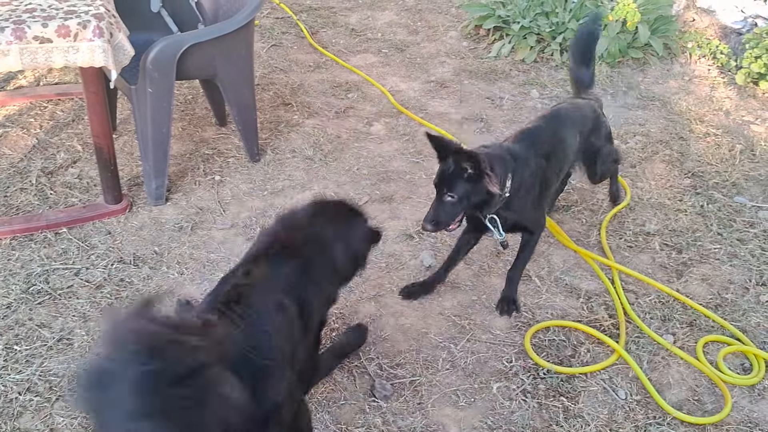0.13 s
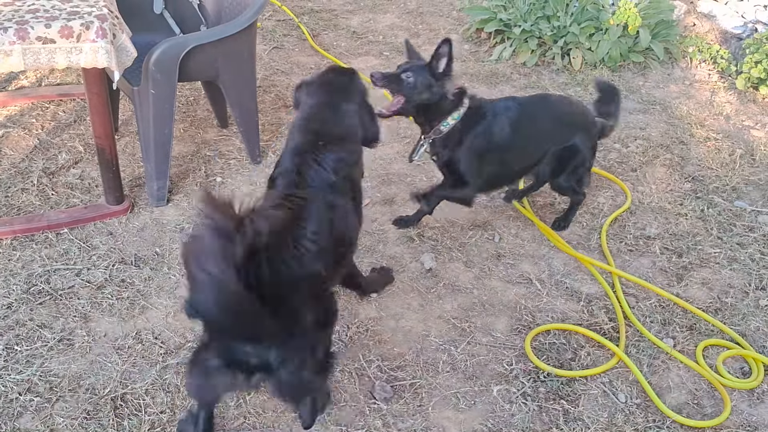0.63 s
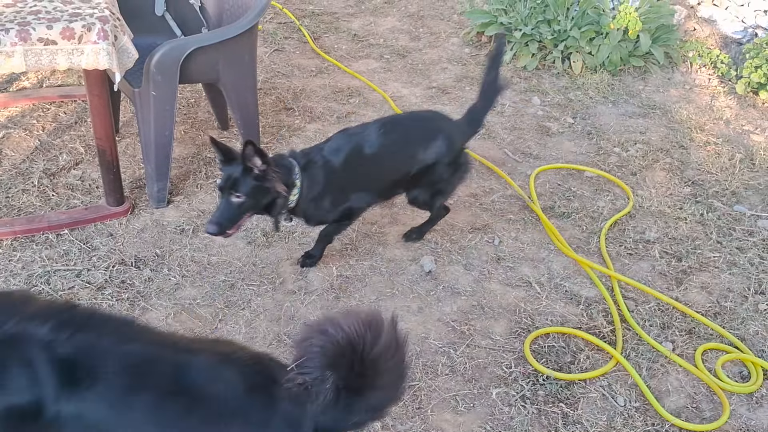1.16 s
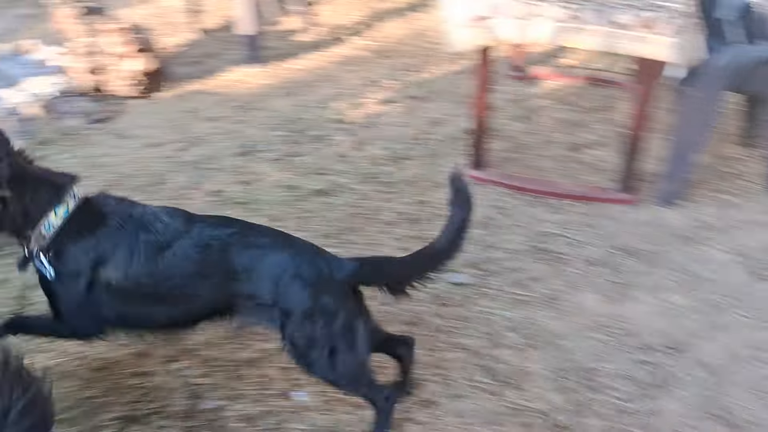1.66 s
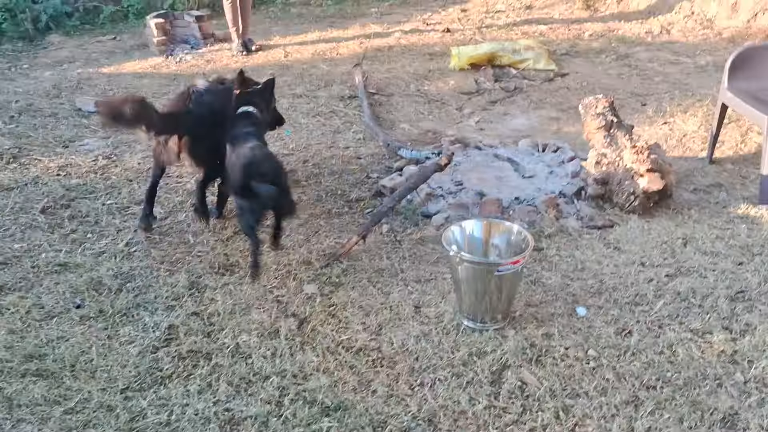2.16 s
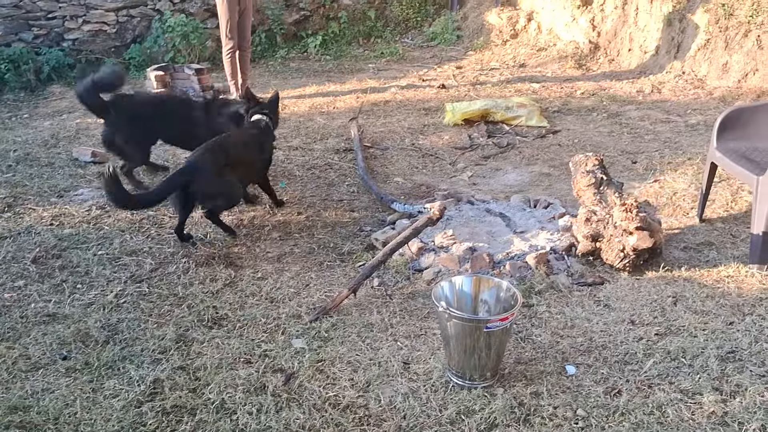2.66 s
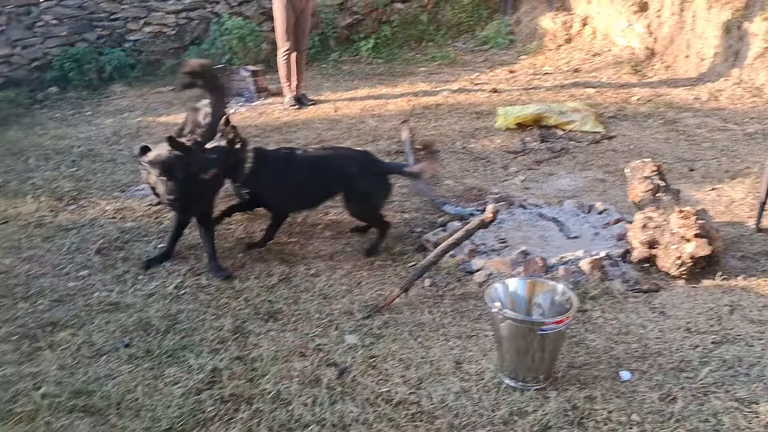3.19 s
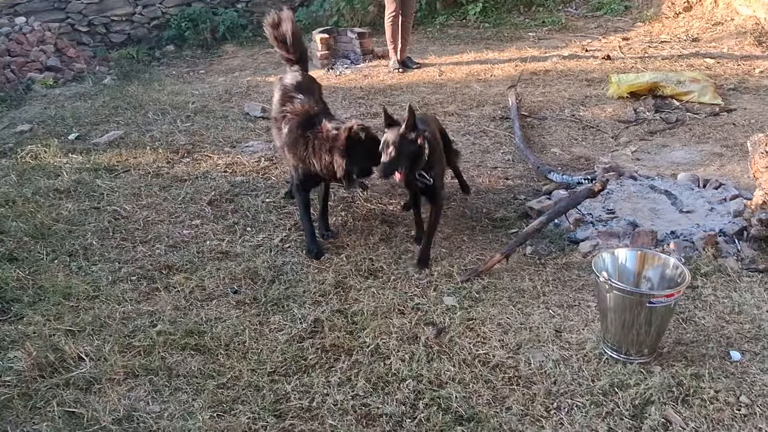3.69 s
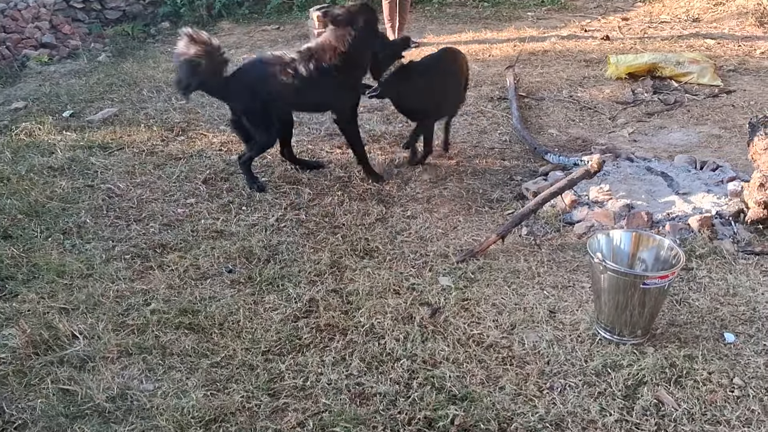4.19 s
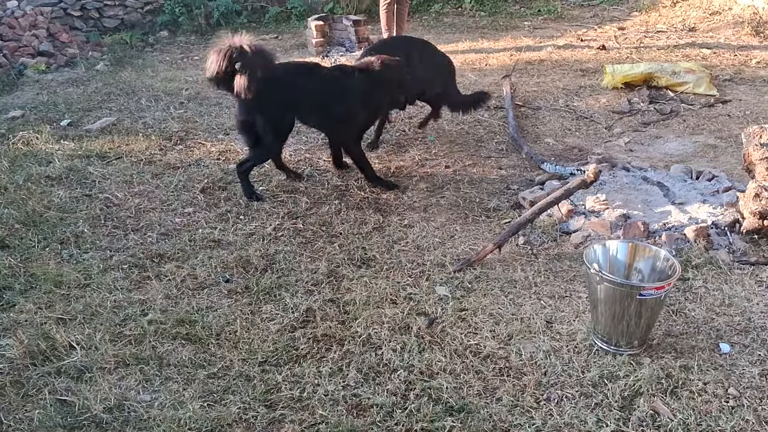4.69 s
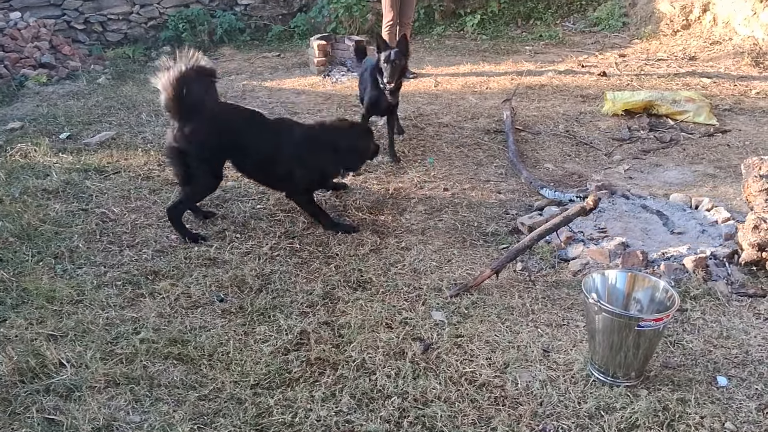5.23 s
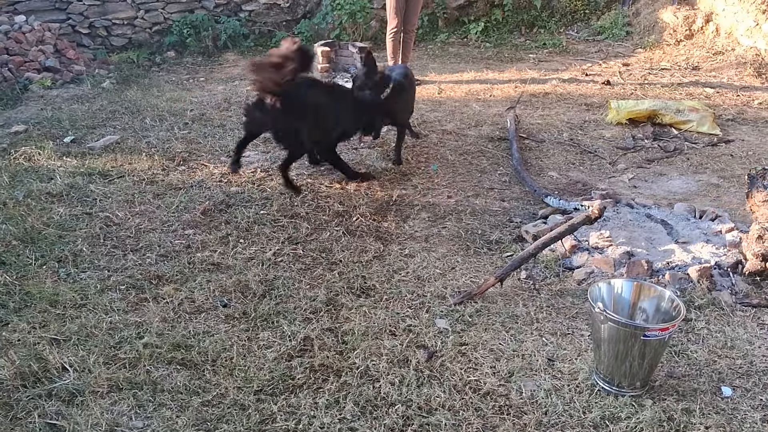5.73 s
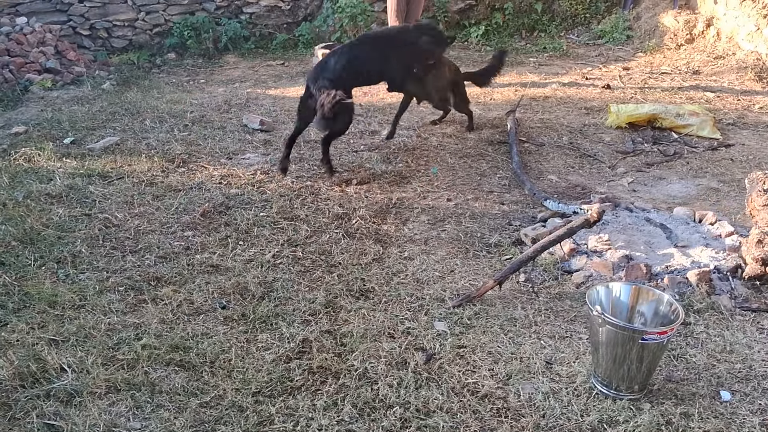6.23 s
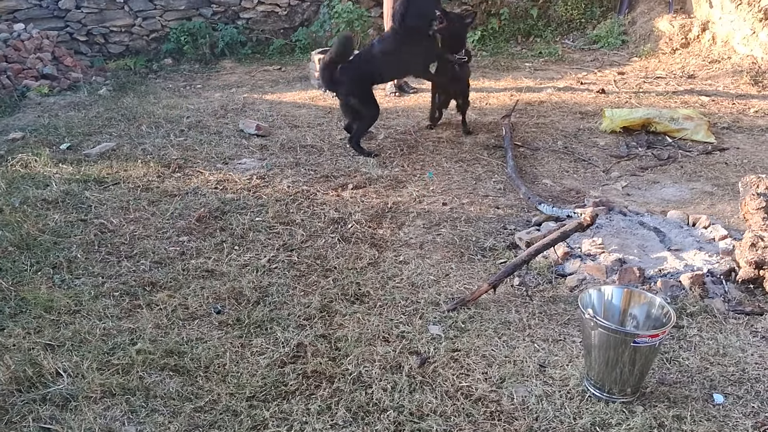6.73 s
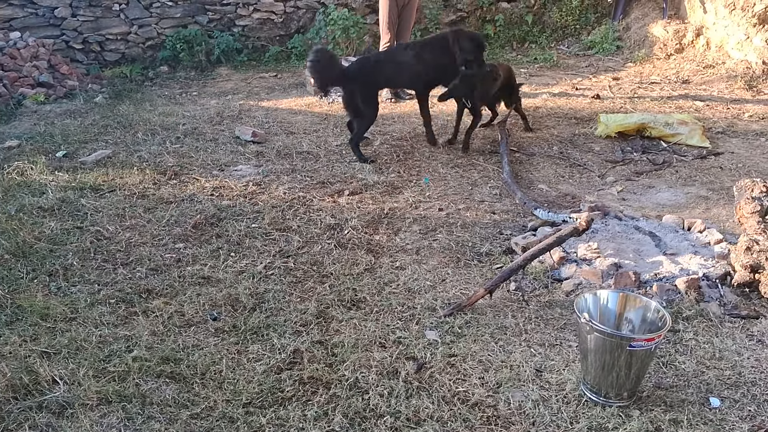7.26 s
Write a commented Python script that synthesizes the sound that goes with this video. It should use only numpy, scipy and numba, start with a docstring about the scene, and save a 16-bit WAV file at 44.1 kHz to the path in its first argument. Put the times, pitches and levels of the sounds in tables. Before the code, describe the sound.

Close outdoor stereo sound of dogs wrestling: low, rasping growls with snarling air, brief gruff grunts, quick breaths, soft paw thumps and rustling dry grass. A tiny collar bell tinkles and rattles almost without pause, brightest in dense clusters. Just after the middle a very faint high whistle rises and sinks. The last long growl is followed by more jingling, panting and a final small grunt.

```python
"""Two dogs wrestle on dry grass, a few steps away: panted breath and crackling grains of grass open the scene.
At once a small collar bell jingles, decaying modes struck by touches, and paws thud as low pushes with dust.
Short grunts alternate with three long growls with snarls: irregular vocal fold beats and air ring chest, throat,
mouth and teeth. Midway a faint whistle, a gliding sine, rises, wavers and sinks; the tussle goes on to the end."""
import sys
import numpy as np
from scipy import signal
from scipy.io import wavfile
from scipy.ndimage import uniform_filter1d
from numba import njit

SR = 44100
rng = np.random.default_rng(int(sys.argv[2]) if len(sys.argv) > 2 else 0)


def attenuation_scalar(level_db):
    """Turn a level in dB into a linear amplitude multiplier (20 dB per decade)."""
    decades = np.asarray(level_db, float) / 20
    return 10 ** decades


def dump(signal):
    """Clip the signal to [-1, 1] and save it as 16-bit WAV at the path in sys.argv[1]."""
    limited = np.clip(np.atleast_2d(signal).T, -1, 1)
    pcm = np.round(limited * 32767).astype(np.int16)
    wavfile.write(sys.argv[1], SR, pcm)


N = 325017

# Levels in the tables are relative: filters, slow chance and the yard shape them further.
# long growls, one curve each: time_s, chest_effort_db, jaw_opening_db (mouth over chest), mouth_hz, beats_hz
GROWL_CURVES = [
    [(0.53, -79.5, -23, 854, 150.9), (0.55, -40.5, -7.5, 880, 154.1), (0.6, -32.5, -6, 870, 169.9),
     (0.65, -33.5, -3, 920, 120.7), (0.71, -29, -9, 760, 153), (0.82, -35.5, -9.5, 940, 156),
     (0.87, -34, -16, 606, 147.2), (0.92, -26.5, -18, 608, 159.2), (0.98, -36.5, -11, 830, 141.6),
     (1.04, -50, -11, 825, 140.7), (1.16, -69, -11, 930, 140)],
    [(3.145, -73, 8, 763, 150.7), (3.165, -38, -2, 730, 156.5), (3.236, -37, 4, 753.4, 179.8),
     (3.254, -26.5, 4.5, 783, 192.2), (3.33, -31, 0, 904, 180.5), (3.4, -34.5, -2, 660, 181),
     (3.5, -35, -13.5, 680.4, 156.4), (3.59, -37.5, -18.5, 621.4, 141.7), (3.71, -43.5, -14.5, 790, 123.1),
     (3.8, -48, 2.5, 770, 118.4), (3.98, -72, -3, 918, 113.1)],
    [(5.82, -73.5, -19, 701, 163.5), (5.845, -35.5, -15.5, 687, 173.8), (5.93, -35.5, -19, 710, 150.6),
     (6.02, -37.5, -15.5, 898.3, 159.7), (6.13, -34.5, -7.5, 647.5, 148.5), (6.16, -47, -27, 852, 144.2),
     (6.18, -42, -4.5, 758, 149.8), (6.23, -34.5, -12.5, 588.8, 161.1), (6.29, -35.5, -25, 639.3, 146.9),
     (6.36, -36.5, 2, 727, 150.1), (6.41, -31.5, -12.5, 795.5, 150.6), (6.51, -29, -2.5, 835, 154.5),
     (6.61, -36.5, -1.5, 865.3, 144.8), (6.7, -56, -12, 961, 138.4)],
]
# throat of each long growl: throat_hz, over_chest_db, share of the jaw opening it follows
GROWL_THROATS = [(400, 6, 1), (348, -3.5, 0.23), (415.5, -17, 0.031)]
# short grunts: peak_s, hold_s, chest_db, jaw_opening_db, mouth_hz
GRUNTS = [(0.213, 0.02, -43.5, -8, 600), (2.293, 0.029, -30.5, -11, 645), (2.776, 0.037, -47.5, -26, 704),
          (5.229, 0.048, -28.5, -18.5, 892), (5.63, 0.02, -44.5, -4.5, 624.7), (7.317, 0.05, -44, -50, 880)]
# throat of every grunt: throat_hz, over_chest_db, share of the jaw opening it follows
GRUNT_THROAT = (392, 0.47, 0.85)
# panted breaths: peak_s, hold_s, mouth_db, mouth_hz, depth_db (chest over mouth)
PANTS = [(0.001, 0.0026, -57.5, 1290, -6.5), (0.28, 0.1, -52, 1320, -3.5), (1.406, 0.21, -52.5, 1100, -0.5),
         (1.869, 0.15, -56, 1040, 1.5), (2.039, 0.057, -58.5, 700, 3.5), (2.824, 0.012, -52.5, 650, -7.5),
         (3.069, 0.059, -51.5, 777, -12), (3.707, 0.044, -49, 1220, -13), (3.82, 0.013, -42, 825, -20.5),
         (4.341, 0.15, -61.5, 886, -14.5), (4.621, 0.054, -46.5, 868, -6.5),
         (4.709, 0.081, -48.5, 1250, -4), (4.886, 0.041, -62.5, 1074, -7),
         (6.816, 0.16, -52.5, 782.2, -5.5), (7.181, 0.023, -53, 985, -14),
         (7.353, 0.031, -41.5, 875, -31.5)]
# rasping air of snarls; the two faintest rows only brighten the rasp of pants:
# peak_s, hold_s, level_db, lips_db (gain of the upper rasp)
SNARLS = [(0.587, 0.096, -43, -1.5), (0.74, 0.037, -54, -19), (0.928, 0.097, -51, -1.5),
          (2.302, 0.091, -49, 3), (3.24, 0.085, -38, -11), (3.37, 0.021, -47.5, -9),
          (3.711, 0.045, -78, 5.5), (3.806, 0.027, -81, -2), (5.256, 0.031, -53.5, -2),
          (6.341, 0.13, -51, -12.5), (6.484, 0.12, -42.5, -5.5)]
# quiet breathing between the sounds: chest_db, throat_db, mouth_db, rasp_db
REST_DB = [-75, -104, -108.5, -76]
# unequal strong and weak beats: time_s, half_db (tone at half the beat rate), upper_db (at one and a half times)
BEAT_LIMP = [(0.55, 2, -16), (0.65, -5, -8), (0.75, -13, -30), (0.96, 8.5, -7), (2.3, -0.5, -5),
             (3.2, 5, 4), (3.43, 1.5, 16.5), (3.6, 11, -6.5), (5.25, -2.5, -6.5), (5.86, -9.5, 7),
             (6.1, 1, -13), (6.33, -4.5, 8), (6.47, -0.5, -0.5), (6.6, -1, 2), (7.33, 14, -11)]
# rasp resonances around which the jaw slides: centre_hz, width_hz, level_db
RASP_MODES = [(1736, 360, 20), (2305, 320, 17.5), (2865, 150, 20), (4000, 990, 10)]
# bouts of scuffling: peak_s, level_db (grass hiss above 6 kHz)
SCUFFLES = [(0.001, -64), (0.551, -55.5), (0.9, -56.5), (1.15, -58.5), (1.457, -51), (1.97, -58),
            (2.28, -59), (3.204, -59), (3.86, -64), (4.352, -73), (4.76, -57.5), (5.439, -72.5),
            (5.97, -64.5), (6.2, -66), (6.44, -57.5), (6.83, -61.5), (7.101, -66.5), (7.36, -81)]
# colour of the grass: band_hz, density_db (per Hz)
GRASS_COLOUR = [(300, 8), (800, 5), (1500, 0), (2800, -6.5), (4500, 6.5), (7000, -7.5), (11000, -9),
                (15500, -9.5)]
# how alike left and right hear the grass: band_hz, likeness (0-1)
GRASS_LIKENESS = [(60, 0.9), (240, 0.62), (950, 0.47), (1300, 0), (15000, 0)]
# how far the grass leans left: band_hz, left_over_right_db
GRASS_LEAN = [(400, 0.3), (1300, 4), (4400, 5), (15000, 7)]
# touches on the bell: start_s, tick_db, ring_db, place_deg (on the rim)
BELL_TOUCHES = [(0.052, -46, -49, 54), (0.133, -51, -40, 46), (0.22, -58, -29.5, 104),
                (0.255, -48, -47, 300), (0.358, -40.5, -27, 347), (0.398, -46, -30, 276),
                (0.4393, -43, -25.5, 300), (0.447, -59, -15.5, 125), (0.495, -59, -32, 180),
                (0.58, -38, -21, 106), (0.665, -32, -12.5, 101), (0.719, -37, -37, 300),
                (0.869, -28.5, -20, 308), (0.9734, -42, -39, 300), (0.993, -34.5, -16, 121),
                (1.0227, -35, -13.5, 129), (1.064, -33.5, -12.5, 117), (1.142, -39, -34, 124),
                (1.194, -55, -33, 320), (1.267, -30.5, -26, 134), (1.318, -58, -38, 300),
                (1.401, -51, -37, 270), (1.4493, -60, -18, 22), (1.5424, -35.5, -16.5, 353),
                (1.6766, -42.5, -38, 120), (1.736, -42, -35, 260), (1.873, -39, -29, 250),
                (1.9817, -55, -20, 49), (2.005, -41, -49, 60), (2.0805, -45.5, -37, 250),
                (2.108, -47, -36, 300), (2.125, -54, -35.5, 270), (2.328, -68, -31, 304),
                (2.364, -50, -32, 360), (2.3914, -48, -32, 377), (2.675, -49, -26.5, 114),
                (2.735, -66, -31.5, 84), (2.811, -53, -35, 122), (2.946, -59, -32, 125),
                (3.03, -36.5, -21, 250), (3.056, -38.5, -23.5, 49), (3.071, -32.5, -20, 125),
                (3.104, -50, -15, 125), (3.154, -35, -31, 300), (3.2429, -40, -15.5, 23),
                (3.2704, -42, -36, 41), (3.297, -50, -29.5, 300), (3.339, -22.5, -17.5, 352),
                (3.3768, -33, -19, 262), (3.439, -50, -18, 122), (3.463, -42, -21, 35),
                (3.523, -48, -31, 9.1), (3.595, -40.5, -19, 364), (3.685, -49, -43, 144),
                (3.758, -56, -38, 360), (3.889, -44, -42, 300), (3.9624, -36, -21.5, 271),
                (4.021, -51, -37, 53), (4.1674, -40, -25, 360), (4.1984, -34, -22.5, 104),
                (4.319, -36, -30.5, 330), (4.371, -40, -60, 59), (4.404, -47, -28, 96),
                (4.461, -40.5, -30.5, 22), (4.533, -65, -23, 83), (4.607, -34, -23.5, 101),
                (4.6344, -43.5, -33, 255), (4.725, -39, -23, 220), (4.749, -34, -15.5, 350),
                (4.906, -58, -32, 43), (4.956, -76, -24, 361), (5.0707, -41, -31, 250),
                (5.254, -47.5, -37, 260), (5.336, -46, -16, 99), (5.358, -38, -16.5, 78),
                (5.397, -40, -25, 9.2), (5.449, -40, -20, 286), (5.462, -37, -17.5, 107),
                (5.501, -39.5, -21.5, 49), (5.524, -51, -25, 400), (5.576, -70, -35, 22),
                (5.6064, -46.5, -35, 303), (5.7495, -47, -31, 129), (5.792, -59, -17.5, 99),
                (5.928, -41, -29, 220), (6.05, -55, -26, 111), (6.105, -51, -18, 108),
                (6.2599, -40, -32.5, 313), (6.309, -24.5, -11, 105), (6.381, -38, -32.5, 165),
                (6.465, -40, -21, 114), (6.561, -46, -24, 110), (6.607, -69, -31, 36.3),
                (6.655, -55, -56, 175), (6.7129, -62, -36, 335), (6.789, -37, -18, 107),
                (6.8518, -39, -27.5, 103), (6.882, -28.5, -15, 363), (6.947, -65, -28, 250),
                (6.9853, -39, -23.5, 303), (7.017, -36, -14.5, 108), (7.1, -31, -29, 296),
                (7.148, -30.5, -13.5, 112), (7.252, -49, -25.5, 374), (7.283, -33, -18, 229)]
# modes of the low, middle and high ring: pitch_hz, level_db, t60_s, left_over_right_db
BELL_MODES = [
    [(1974, -8.5, 0.41, 6), (1996, -15.5, 0.31, 2.5)],
    [(4092, 2, 0.056, 11), (4150, -2.5, 0.2, 9.5), (11400, -29, 0.19, -2)],
    [(5397, -3, 0.47, -1.5), (5303, -1, 0.16, 3), (8045, -29, 0.14, 35), (10300, -20, 0.064, 11),
     (14200, -34.5, 0.051, 39)],
]
# where on the rim the low, middle and high ring answer best: place_deg
RING_PLACES = [60, 300, 180]
# colour of the contact tick: centre_hz, width_hz, level_db
TICK_MODES = [(4620, 1540, 4), (7970, 770, 1.5), (9800, 4800, -5), (12370, 930, 6.5), (16000, 1500, 0.5)]
# short high modes that hiss on after a touch, before its detuning: centre_hz, width_hz, level_db
SHIMMER_MODES = [(7450, 280, -3), (10507, 103, 2.5), (12140, 290, 3), (14580, 680, -1.5)]
# paw falls: start_s, level_db, ground_hz
PAW_FALLS = [(0.113, -35.5, 238), (0.188, -30.5, 204), (0.224, -31, 186), (0.355, -29.5, 484),
             (1.269, -41, 306), (1.397, -35.5, 630), (1.471, -26, 470), (1.871, -38.5, 430),
             (2.124, -40.5, 153), (2.407, -33, 148.8), (2.49, -35.5, 154), (2.854, -31.5, 660),
             (4.394, -38, 845), (4.475, -40.5, 890), (4.604, -31, 880), (4.749, -33.5, 400),
             (5.648, -33.5, 187), (6.167, -48, 150.9), (6.98, -31.5, 790), (7.165, -34.5, 960)]
# the whistle's glide: time_s, pitch_hz, level_db
WHISTLE_GLIDE = [(4.06, 3750, -94), (4.085, 3900, -58), (4.135, 4600, -56), (4.225, 4620, -59),
                 (4.26, 4430, -55), (4.33, 4540, -57), (4.39, 4550, -57), (4.425, 4200, -59),
                 (4.45, 4100, -100)]
# ground and walls: delay_s, level_db
ECHOES = [(.004, -16.5), (0.009, -15.5), (0.022, -12.5), (.041, -15.5)]
# fixed dips in the spectrum: centre_hz, width_hz, depth (0-1)
TREBLE_DIPS = [(2800, 5200, 0.22), (6320, 1110, 0.62), (9050, 1050, 0.5)]

TIME_S = np.arange(N) / SR
STEPS_S = np.arange(0, N / SR + .002, .001)   # control times
# air noise over beats, and the share that leaks between the beats
THROAT_AIR, MOUTH_AIR, RASP_AIR, STEADY_AIR = .6, .65, 2.6, .55
GRUNT_HZ, PITCH_HZ_PER_DB = 153, 1.3   # a grunt at -35 dB; more effort, faster beats
# throat over chest, rasp over mouth, and the low tunings of a pant
PANT_THROAT_DB, PANT_RASP_DB, PANT_THROAT_HZ, PANT_CHEST_HZ = -2, -7.5, 375, 136.66
OFF_PLACE_DB = 16.5   # loss of a ring touched a quarter turn away
RING_KEPT = 0.7       # share of the old ringing that outlives a touch
RATTLE_DB = 1         # clapper rattle over the scuffling level
STILL_DB = -73.5      # grass between the bouts
RIGHT_LAG_S = 0.000094


def rms_one(x):
    """Scale to rms 1."""
    return x / np.sqrt(np.mean(x ** 2) + 1e-20)


def in_time(rows):
    """Draw the columns after the first as curves at every sample."""
    s, *columns = np.transpose(rows)
    return [np.interp(TIME_S, s, column) for column in columns]


def at_hz(points, hz):
    """Read a spectrum on a log frequency axis."""
    point_hz, values = np.transpose(points)
    return np.interp(np.log(hz), np.log(point_hz), values)


def drift(rate_hz):
    """Slow chance with spread 1: noise through two equal one-pole low-passes."""
    r = np.exp(-2 * np.pi * rate_hz / SR)
    noise = rng.standard_normal(N + SR)
    return rms_one(signal.lfilter([1], [1, -2 * r, r * r], noise)[SR:])


def band_pass(x, order, low_hz, top_hz):
    """Butterworth band-pass."""
    return signal.sosfilt(signal.butter(order, [low_hz, top_hz], "band", fs=SR, output="sos"), x)


@njit
def moving_poles(x, radius, cosine):
    """Two-pole resonance whose centre moves."""
    out = np.zeros(len(x))
    for i in range(2, len(x)):
        drive = (1 - radius ** 2) / 2 * (x[i] - x[i - 2])
        out[i] = drive + 2 * radius * cosine[i] * out[i - 1] - radius ** 2 * out[i - 2]
    return out


def resonance(x, hz, width_hz):
    """Resonance with gain 1 on top; hz may be a curve."""
    cosine = np.cos(2 * np.pi * hz / SR) + np.zeros(N)
    return moving_poles(x + 1e-18, np.exp(-np.pi * width_hz / SR), cosine)


def double_resonance(x, hz, first_width_hz, second_width_hz):
    """Two resonances in a row on one centre, for steeper skirts."""
    return resonance(resonance(x, hz, first_width_hz), hz, second_width_hz)


def resonances(x, modes):
    """Parallel resonances, signs alternating."""
    return sum((-1) ** k * attenuation_scalar(db) * resonance(x, hz, width_hz)
               for k, (hz, width_hz, db) in enumerate(modes))


def evened(x, span_s):
    """Divide out the slow level, leaving loudness to the effort curve."""
    return x / np.sqrt(uniform_filter1d(x ** 2, size=int(span_s * SR)) + 1e-12)


def panned(x, db):
    """Left louder than right by db."""
    return x * attenuation_scalar(np.array([[db / 2], [-db / 2]]))


def burst_db(s, hold_s, db, rise_db_per_s, fall_db_per_s):
    """Level that climbs to db at s, holds and sinks."""
    rise = rise_db_per_s * np.maximum(s - STEPS_S, 0)
    fall = fall_db_per_s * np.maximum(STEPS_S - s - hold_s, 0)
    return db - rise - fall


def summed_db(levels, rest_db):
    """Power sum of level curves over a resting level."""
    return 10 * np.log10(np.sum(attenuation_scalar(np.array(levels)) ** 2, axis=0) + attenuation_scalar(rest_db) ** 2)


def voiced_sound(effort_db, opening_db, mouth_hz, beats_hz, throat):
    """Effort and jaw opening set chest, throat and mouth of a growl."""
    throat_hz, over_chest_db, follows = throat
    throat_db = effort_db + over_chest_db + follows * opening_db
    return effort_db, throat_db, effort_db + opening_db, beats_hz, throat_hz, mouth_hz


def vocal_controls():
    """Add up growls, grunts, pants and rasps; pitch and resonances lean to the loudest by power."""
    sounds, rasp = [], []
    for s, hold_s, db, _ in SNARLS:
        rasp.append(burst_db(s, hold_s, db, rise_db_per_s=253, fall_db_per_s=185))
    for rows, throat in zip(GROWL_CURVES, GROWL_THROATS):
        s, effort_db, *shape = np.transpose(rows)
        effort_db = np.interp(STEPS_S, s, effort_db, left=-120, right=-120)
        shape = [np.interp(STEPS_S, s, column) for column in shape]
        sounds.append(voiced_sound(effort_db, *shape, throat))
    for s, hold_s, db, opening_db, mouth_hz in GRUNTS:
        effort_db = burst_db(s, hold_s, db, rise_db_per_s=353, fall_db_per_s=173)
        beats_hz = GRUNT_HZ + PITCH_HZ_PER_DB * np.maximum(effort_db + 35, -30)
        sounds.append(voiced_sound(effort_db, opening_db, mouth_hz, beats_hz, GRUNT_THROAT))
    for s, hold_s, db, mouth_hz, depth_db in PANTS:
        air_db = burst_db(s, hold_s, db, rise_db_per_s=300.5, fall_db_per_s=180)
        chest_db = air_db + depth_db
        sounds.append((chest_db, chest_db + PANT_THROAT_DB, air_db, PANT_CHEST_HZ, PANT_THROAT_HZ, mouth_hz))
        rasp.append(air_db + PANT_RASP_DB)
    parts = [np.array([column + 0 * STEPS_S for column in part]) for part in zip(*sounds)]
    levels, tunings = parts[:3], parts[3:]
    shares = [attenuation_scalar(np.maximum(level, -300)) ** 2 for level in levels]
    tunings = [np.sum(share * hz, axis=0) / np.sum(share, axis=0) for share, hz in zip(shares, tunings)]
    levels = [summed_db(level, rest_db) for level, rest_db in zip([*levels, rasp], REST_DB)]
    return in_time(np.transpose([STEPS_S, *levels, *tunings]))


def lips_db():
    """How far the lips are drawn back, gliding from one rasp to the next."""
    s, hold_s, _, db = np.transpose(SNARLS)
    return np.interp(TIME_S, s + hold_s / 2, db)


def folds(beats_hz, jitter, uneven_db, weak_db):
    """Slack vocal folds: irregular beats, strong and weak in turn; also how far they stand open."""
    cycles = np.cumsum(beats_hz * np.exp(jitter * drift(40) + .03 * drift(8))) / SR
    count = cycles.astype(int)
    sizes = attenuation_scalar(uneven_db * rng.standard_normal(N)[count] + weak_db * (count % 2))
    beats = sizes * (np.diff(count, prepend=0) > 0)
    return beats, sizes * np.exp(-3.0 * (cycles % 1))


def dogs():
    """One beat train rings chest, throat and mouth; air noise gated by the beats makes it hoarse."""
    chest_db, throat_db, mouth_db, rasp_db, beats_hz, throat_hz, mouth_hz = vocal_controls()
    beats, opening = folds(beats_hz, jitter=.045, uneven_db=2.0, weak_db=-4)
    voiced = np.clip((chest_db + 54.0) / 14, 0, 1)   # without chest tone only panted air is left
    air = rng.standard_normal(N) * (1 - voiced + voiced * rms_one(opening))
    leak = STEADY_AIR * rng.standard_normal(N)

    def hoarse(share):
        """Beats mixed with a share of air."""
        return voiced * rms_one(beats) + (share + 1 - voiced) * air

    # the strong-weak pattern adds odd multiples of half the beat rate
    half_db, upper_db = in_time(BEAT_LIMP)
    chest = double_resonance(hoarse(0.29), beats_hz, 45, 120)
    chest = chest + attenuation_scalar(half_db) * resonance(hoarse(0.9), beats_hz / 2, 94)
    chest = chest + attenuation_scalar(upper_db) * double_resonance(hoarse(0.21), 3 * beats_hz / 2, 56, 89)
    chest = chest - resonance(chest, 2 * beats_hz, 110)   # the chest does not carry the octave
    chest = band_pass(chest, 3, 68, 280)

    throat = double_resonance(hoarse(THROAT_AIR), throat_hz, 110, 150)
    mouth = double_resonance(hoarse(MOUTH_AIR) + MOUTH_AIR * leak, mouth_hz, 230, 260)
    mouth = mouth - resonance(mouth, 1452, 600)   # the nose swallows a band above the mouth
    panted = double_resonance(air, mouth_hz, 470, 420)   # panted air rings more broadly
    mouth = mouth + 0.6 * (1.2 - voiced) * panted

    hiss = hoarse(RASP_AIR) + RASP_AIR * leak
    jaw = 1 + .05 * drift(7)   # the jaw works, the rasp slides
    sliding = [(hz * jaw, width_hz, db) for hz, width_hz, db in RASP_MODES]
    rasp = resonances(hiss, sliding[:2]) + attenuation_scalar(lips_db()) * resonances(hiss, sliding[2:])
    rasp = band_pass(rasp, 3, 1450, 4200)

    flutter_db = 1.3 * drift(14) + 2 * drift(35)   # the lips flap
    low = attenuation_scalar(chest_db) * evened(chest, 0.043) + attenuation_scalar(throat_db) * evened(throat, 0.086)
    low = low + attenuation_scalar(mouth_db + flutter_db) * evened(mouth, 0.047)
    rasp = attenuation_scalar(rasp_db + flutter_db) * evened(rasp, 0.2)
    return panned(low, 0.072) + panned(rasp, 9.9)


def scuffling():
    """How hard fur and paws work the grass, dB."""
    bouts = [burst_db(s, 0, db, rise_db_per_s=71, fall_db_per_s=58) for s, db in SCUFFLES]
    return in_time(np.transpose([STEPS_S, summed_db(bouts, STILL_DB)]))[0]


def grass():
    """Dry blades crackle: dense uneven grains on hiss, coloured band by band."""
    out, high_power, together = 0, 0, drift(39)
    edges_hz = 300 * 2 ** np.arange(0, 6.1, .5)   # half octaves
    grain_db = 0.6 * np.minimum(rng.exponential(1, N), 6)
    grains = attenuation_scalar(grain_db) * (rng.random(N) < 900 * attenuation_scalar(5.0 * drift(12)) / SR)
    crackle = 1 + rms_one(uniform_filter1d(grains, size=20))
    noises = rng.standard_normal((2, 2, N)) * crackle   # neighbouring bands take different noise
    for k, (low_hz, top_hz) in enumerate(zip(edges_hz, edges_hz[1:])):
        mid, side = band_pass(noises[k % 2], 2, low_hz, top_hz)
        hz = np.sqrt(low_hz * top_hz)
        alike = at_hz(GRASS_LIKENESS, hz)
        patchy_db = 2 * together + 2.8 * drift(15)
        stereo = np.sqrt(1 + alike) * mid + np.sqrt(1 - alike) * side * [[1], [-1]]
        band = panned(attenuation_scalar(at_hz(GRASS_COLOUR, hz) + patchy_db) * stereo, at_hz(GRASS_LEAN, hz))
        out = out + band
        high_power = high_power + np.mean(band ** 2) * (hz > 6000)
    return attenuation_scalar(scuffling()) * out / np.sqrt(high_power)


def ring_starts(s, struck, t60):
    """Height of a mode just after each touch: the new blow plus what is left of the old ringing."""
    heights = [struck[0]]
    for gap_s, blow in zip(np.diff(s), struck[1:]):
        left_over = RING_KEPT * heights[-1] * attenuation_scalar(-60 * gap_s / t60)
        heights.append(np.hypot(blow, left_over))
    return np.array(heights)


def fading(pulses, t60):
    """Let every pulse die away by 60 dB in t60 seconds."""
    return signal.lfilter([1], [1, -attenuation_scalar(-60 / (t60 * SR))], pulses)


def bell_ringing(s, rings_db, last, since_s, rattle, shift):
    """Ring the modes as decaying sines; touches damp them and restart their phase."""
    out = np.zeros((2, N))
    for ring_db, modes in zip(rings_db, BELL_MODES):
        waver_db = 2.6 * drift(22)
        for hz, db, t60, side_db in modes:
            phase, spread = rng.random((2, 400))
            blow_db = ring_db + db + 3.24 * (spread[:len(s)] - 3.0)
            level = ring_starts(s, attenuation_scalar(blow_db), t60)[last] * attenuation_scalar(-60 * since_s / t60) * (TIME_S >= s[0])
            light = fading(rattle * attenuation_scalar(db + 9.7 * rng.standard_normal(N)), 0.17 * t60)
            level = uniform_filter1d(level + light, size=100) * attenuation_scalar(waver_db)
            # left and right see the turning bell with a phase of their own
            turns = hz * np.cumsum(shift) / SR + uniform_filter1d(0.69 * phase[last], size=220)
            turns = turns + np.array([[0], [1]]) * (0.23 + 0.35 * drift(3.55))
            out += panned(level, side_db) * np.sin(2 * np.pi * turns)
    return out


def bell_contact(touch, last, since_s, rattle, detune):
    """The contact itself: a noise burst of a few ms, and high modes that hiss on."""
    burst = touch * (attenuation_scalar(-60 * since_s / 0.011) + 0.22 * attenuation_scalar(-60 * since_s / 0.27))
    tail = touch * 0.73 * attenuation_scalar(-60 * since_s / 0.072)
    light = fading(rattle * attenuation_scalar(2.1 * rng.standard_normal(N)), 0.044)
    shared, *own = rng.standard_normal((3, N))   # left and right hear much the same contact
    colour_db = 4.5 * rng.standard_normal((400, 4))[last].T   # each touch favours other high modes
    shimmer = [(hz * (1 + .02 * off), width_hz, db)
               for off, (hz, width_hz, db) in zip(detune, SHIMMER_MODES)]
    sides = []
    for noise in shared + 0.9 * np.array(own):
        tick = resonances((burst + 0.7 * light) * noise, TICK_MODES)
        hissing = (tail + 2.5 * light) * noise
        sides.append(tick + sum(resonances(hissing * attenuation_scalar(db), [mode]) for db, mode in zip(colour_db, shimmer)))
    return panned(np.array(sides), 6.5)


def bell():
    """Touches strike ring and tick together; between them the clapper rattles lightly."""
    s, tick_db, ring_db, place = np.transpose(BELL_TOUCHES)
    rings_db = [ring_db - OFF_PLACE_DB * (1 - np.cos(np.radians(place - best))) for best in RING_PLACES]
    last = np.maximum(np.searchsorted(s, TIME_S, side="right") - 1, 0)
    since_s = np.abs(TIME_S - s[last])
    detune = rng.standard_normal((400, 5))[last].T   # each touch finds the bell held a little differently
    shift = 1 + 0.003 * drift(4) + 0.002 * drift(18)   # the bell swings toward and away
    shift = shift + 0.003 * detune[4]
    rattle = (rng.random(N) < 90 * attenuation_scalar(4.0 * drift(5)) / SR) * attenuation_scalar(scuffling() + RATTLE_DB)
    touch = attenuation_scalar(tick_db[last]) * (TIME_S >= s[0])
    ringing = bell_ringing(s, rings_db, last, since_s, rattle, shift)
    return ringing + bell_contact(touch, last, since_s, rattle, detune)


def paws():
    """A low push of about two cycles and a puff of dust."""
    out = np.zeros(N)
    for s, db, hz in PAW_FALLS:
        start = round(s * SR)
        t = np.arange(min(4000, N - start)) / SR
        push = np.sin(2 * np.pi * hz * t) * np.exp(-t * hz / 1.1)
        dust = uniform_filter1d(rng.standard_normal(4000), size=12)[:len(t)]
        puff = 0.37 * dust * np.exp(-t / 0.028)
        out[start:][:len(t)] += attenuation_scalar(db) * (push + puff)
    return out


def whistle():
    """A faint thin sine glides up, wavers in level and sinks."""
    hz, db = in_time(WHISTLE_GLIDE)
    return attenuation_scalar(db + 1.6 * drift(20)) * np.sin(2 * np.pi * np.cumsum(hz) / SR)


def yard(x):
    """A few dull echoes, a little later on the right."""
    dull, out = signal.lfilter([.3], [1, -.7], x), x.copy()
    for s, db in ECHOES:
        for side, stretch in enumerate([1, 1.03]):
            lag = round(s * stretch * SR)
            out[side, lag:] += attenuation_scalar(db) * dull[side, :-lag]
    return out


def scene():
    """Dogs and paws echo in the yard; bell, grass and whistle are heard direct."""
    return yard(dogs() + paws()) + bell() + grass() + panned(whistle(), 5.4)


def top_cut(x):
    """Nothing passes above the cut-off."""
    return signal.sosfilt(signal.butter(12, 16990, fs=SR, output="sos"), x)


def record(dry):
    """The right side hears a little later; fixed notches thin the treble; both ends are cut."""
    samples = np.arange(N)
    x = np.array([dry[0], np.interp(samples - RIGHT_LAG_S * SR, samples, dry[1])])
    for hz, width_hz, depth in TREBLE_DIPS:
        x = x - depth * np.array([resonance(side, hz, width_hz) for side in x])
    x = signal.sosfilt(signal.butter(3, 50, "high", fs=SR, output="sos"), x)
    x = signal.sosfilt(signal.cheby2(8, 30, 16150, fs=SR, output="sos"), x)   # 30 dB down from 16150 Hz up
    return top_cut(x)


dry = scene()
out = record(dry)
dump(out)
```